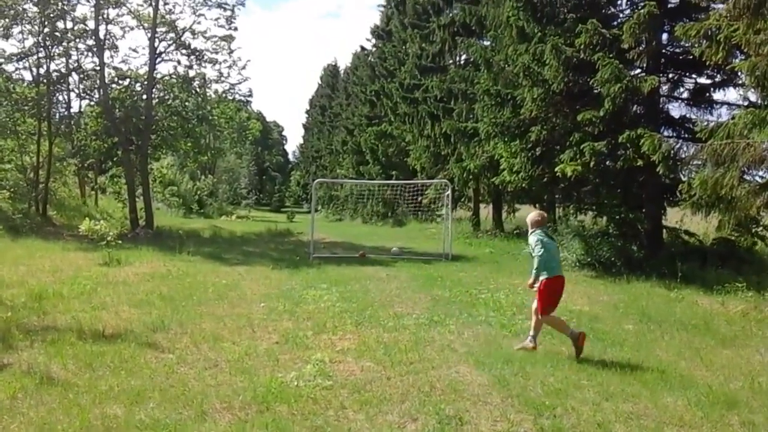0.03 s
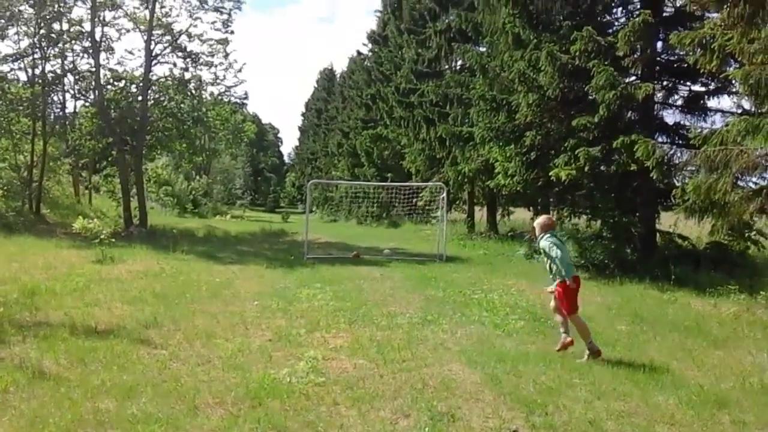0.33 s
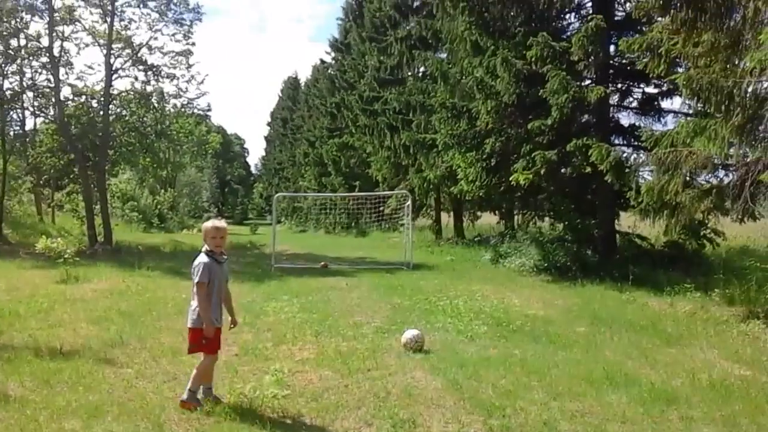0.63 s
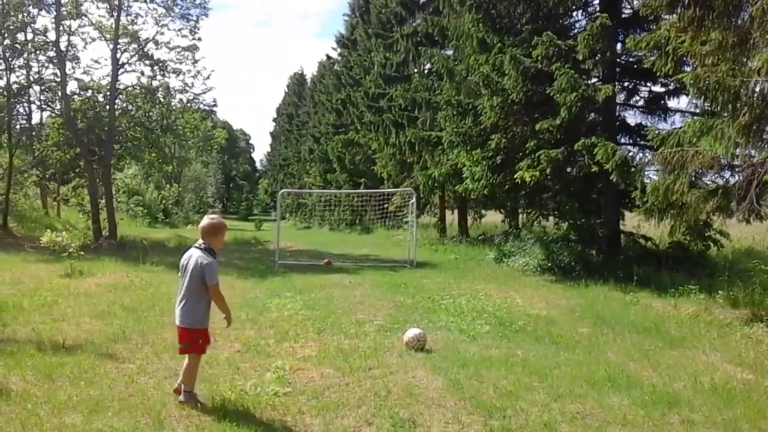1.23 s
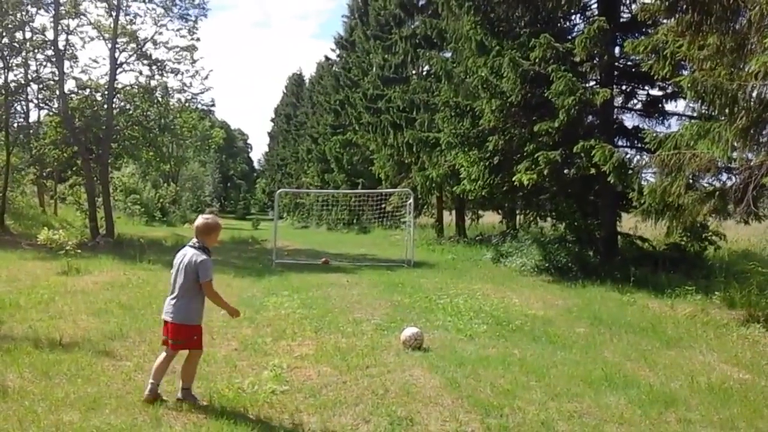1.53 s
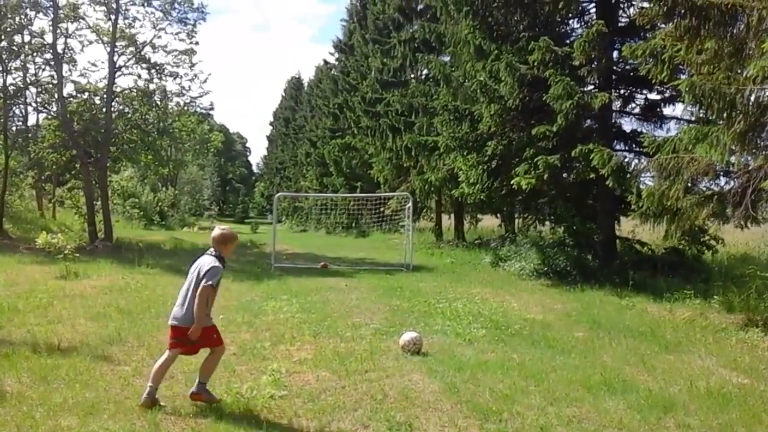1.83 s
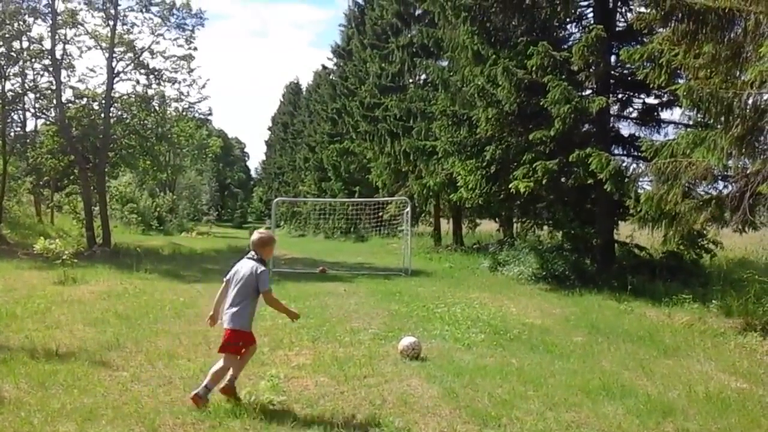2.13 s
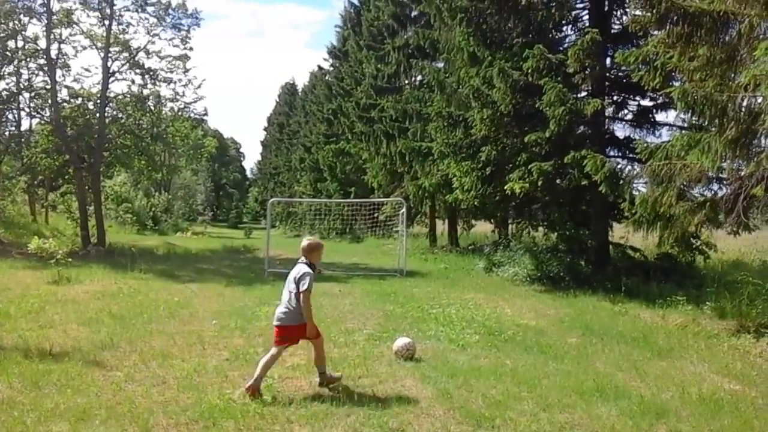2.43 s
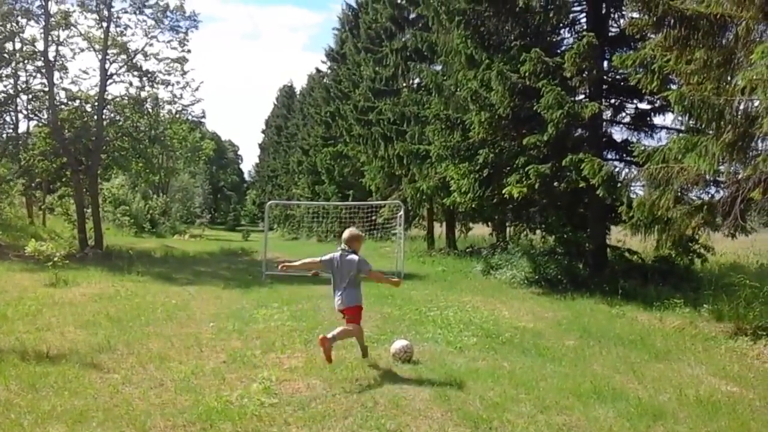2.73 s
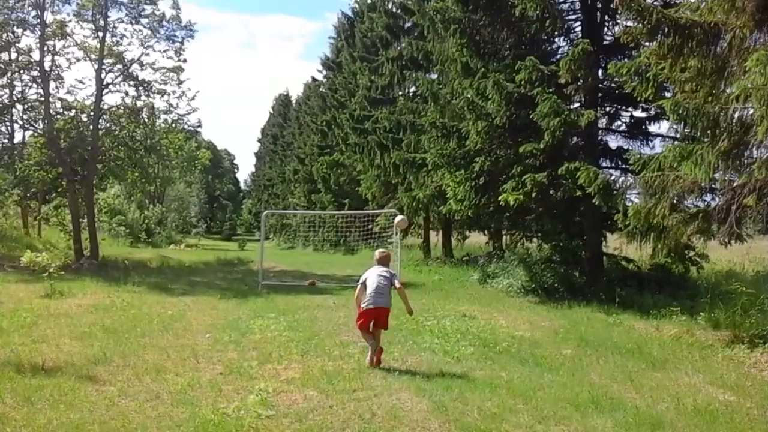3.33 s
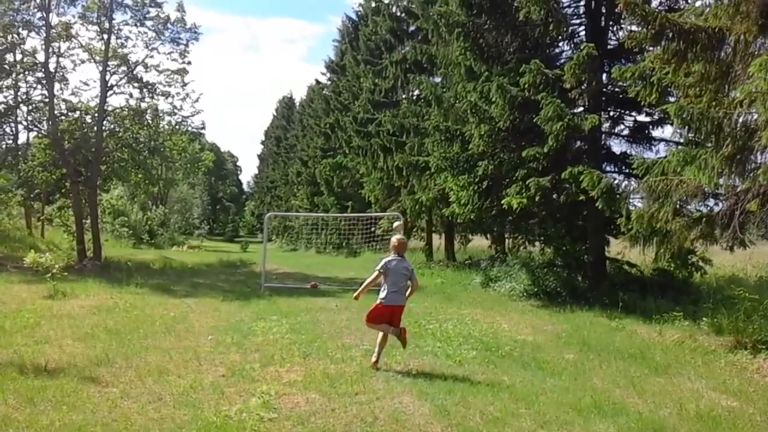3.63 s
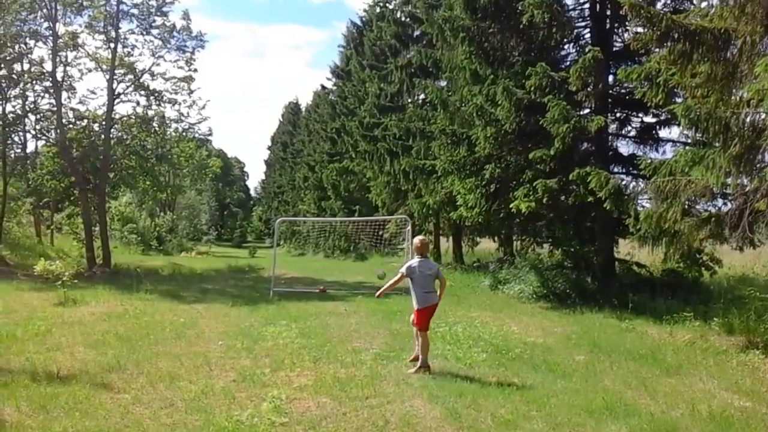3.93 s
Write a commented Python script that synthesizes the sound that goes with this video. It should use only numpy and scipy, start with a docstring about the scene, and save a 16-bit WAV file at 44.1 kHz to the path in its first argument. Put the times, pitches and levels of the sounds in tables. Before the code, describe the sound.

A football is kicked with a sharp thump after a soft run-up through grass, then clanks against a metal goal. An earlier goal rattle opens the scene. Light wind puffs at the microphone, with close ticks and a distant bird.

```python
"""A light metal football goal rattles under a shot, its tubes ringing and the trees round the meadow
echoing it, until the sound stops dead. A child runs up through the grass and kicks: the skin slaps,
the shell thumps, the air inside pings. This ball hits the goal frame too. Throughout, light wind puffs
at the microphone, something ticks close by and a small bird whistles far away."""
import sys
import numpy as np
from scipy import signal
from scipy.fft import rfft, irfft
from scipy.io import wavfile

SR = 44100
rng = np.random.default_rng(int(sys.argv[2]) if len(sys.argv) > 2 else 0)


def transcribe(signal):
    """Save signal, clipped to [-1, 1], as a 16-bit WAV file at the path in sys.argv[1]."""
    frames = np.atleast_2d(signal).T
    limited = np.clip(frames, -1, 1)
    pcm = np.round(limited * 32767).astype(np.int16)
    wavfile.write(sys.argv[1], SR, pcm)


N = 176400
TIME = np.arange(N) / SR


def amp(db):
    """Decibels to gain."""
    return 10 ** (np.asarray(db) / 20)


def unit_rms(x):
    """Scales to rms 1."""
    return x / np.sqrt(np.mean(x ** 2) + 1e-20)


def at_hz(points, hz):
    """Interpolates (Hz, value) rows along log frequency."""
    points_hz, values = np.transpose(points)
    return np.interp(np.log(hz + 1), np.log(points_hz + 1), values)


def gain_curve(points):
    """Interpolates (s, dB) rows to a gain per sample."""
    return amp(np.interp(TIME, *np.transpose(points)))


def colour(x, spectrum):
    """Minimum-phase filter from (Hz, dB) rows; attacks stay sharp."""
    hz = abs(np.fft.fftfreq(2 * N, 1 / SR))
    log_gain = np.log(amp(at_hz(spectrum, hz)))
    response = np.exp(np.conj(signal.hilbert(log_gain)))
    return np.fft.ifft(np.fft.fft(x, 2 * N) * response).real[:N]


def unit_colour(x, spectrum):
    """The same filter at unit power gain for white input."""
    return colour(x, spectrum) / np.linalg.norm(colour(signal.unit_impulse(N), spectrum))


def noise(spectrum, envelope):
    """White noise under an envelope, then coloured at unchanged power."""
    return unit_colour(rng.standard_normal(N) * envelope, spectrum)


def wander(rate_hz):
    """Smooth random drift of rms 1."""
    lowpass_divisor = 1 + (np.fft.rfftfreq(N, 1 / SR) / rate_hz) ** 4
    return unit_rms(irfft(rfft(rng.standard_normal(N)) / lowpass_divisor, N))


def burst(start_s, t60_s, rise_s=0.000093):
    """Linear rise, exponential decay."""
    age_s = np.maximum(TIME - start_s, 0)
    return np.minimum(age_s / rise_s, 1) * amp(-60 * np.maximum(age_s - rise_s, 0) / t60_s)


def ring(modes, blows):
    """Decaying (Hz, dB, t60 s) modes, struck at each (s, dB) blow."""
    t = TIME[:SR // 2]
    tone = sum(amp(db - 60 * t / t60_s) * np.sin(2 * np.pi * hz * t) for hz, db, t60_s in modes)
    return sum(amp(db) * np.interp(TIME - start_s, t, tone, left=0, right=0) for start_s, db in blows)


def reverb(x, decay):
    """Diffuse reflections, each band dying as the (Hz, t60 s) rows say."""
    hz, t, bands = signal.stft(rng.standard_normal(SR), SR, nperseg=256)
    fade = amp(-60 * t / at_hz(decay, hz)[:, None])
    tail = signal.istft(bands * fade, SR, nperseg=256)[1]
    return signal.fftconvolve(x, tail / np.linalg.norm(tail))[:N]


# Loose joints clashing. Each row: start in seconds, level in dB, rise in seconds, t60 in seconds.
JOINT_CLASHES = [(.008, -50.5, 0.0047, 0.31), (0.067, -45.5, 0.00078, 0.11), (.082, -31.5, 0.0088, .12),
                 (.104, -32, 0.0011, 0.024), (0.1092, -26.5, 0.00052, 0.043), (0.124, -44.5, 0.0016, 0.094),
                 (3.839, -29.5, 0.00045, 0.037), (3.851, -45, 0.0016, 0.52)]
# Metal snapping on metal; ball striking the frame. Each row: start in seconds, relative level in dB.
JOINT_SNAPS = [(.0695, -44), (0.0872, -41), (0.112, -36), (.126, -38), (.29, -50), (3.8353, -37.5),
               (3.8389, -32), (3.8408, -38), (3.871, -45), (3.9075, -49.5)]
BALL_KNOCKS = [(3.808, -41), (3.818, -50), (3.8275, -38)]
# Goal resonances. Each row: frequency in Hz, relative level in dB, t60 in seconds.
TUBE_MODES = [(1150, -22, .3), (2375, -3, .1), (3227, -13, .12), (4290, -7, .32), (4490, -14, .25),
              (4854, -7, .12), (5610, -7, .06), (6620, -10, .07)]
JOINT_MODES = [(3344, -5.5, 0.032), (3546, -6, 0.022), (4060, -4.5, 0.026), (4335, -5.5, 0.041),
               (4663, -6.5, .032), (5320, -9, .02)]
# Impact spectra. Each row: frequency in Hz, relative level in dB.
CLASH_SPECTRUM = [(100, -11), (500, -24), (900, -19.5), (2000, -10), (2800, -8), (3400, -4), (4400, 1),
                  (5300, -4), (6800, -11), (9000, -16), (15000, -31)]
KNOCK_SPECTRUM = [(50, -28), (150, -5), (450, -13), (800, -8.5), (1150, -1), (1500, -17), (2300, -15),
                  (3000, -24), (4500, -9), (7000, -30), (15000, -45)]


def goal_frame(grain_db=2, tubes_db=-9.5, full_drive_s=0.12):
    """The ball knocks the frame; joints clash and snap. Longer clashes drive the tubes harder."""
    clash_envelope = sum(amp(db) * burst(s, t60_s, rise_s) for s, db, rise_s, t60_s in JOINT_CLASHES)
    grain = unit_rms(amp(grain_db * wander(rate_hz=85)))
    clashes = noise(CLASH_SPECTRUM, clash_envelope * grain)
    tube_blows = [(s, db + 10 * np.log10(t60_s / full_drive_s)) for s, db, _, t60_s in JOINT_CLASHES]
    tubes = amp(tubes_db) * ring(TUBE_MODES, tube_blows)
    snaps = 2 * ring(JOINT_MODES, JOINT_SNAPS)
    knock_envelope = sum(amp(db) * burst(s, t60_s=0.018) for s, db in BALL_KNOCKS)
    return clashes + tubes + snaps + noise(KNOCK_SPECTRUM, knock_envelope)


# Echo off the trees. Each row: frequency in Hz, gain in dB.
ECHO_SPECTRUM = [(100, -16), (500, -12), (1100, -5.5), (1600, -7.5), (2500, -15), (3700, -10.5),
                 (4350, -10.5), (5000, -8), (6500, -8), (15000, -12.5)]
# Its decay. Each row: frequency in Hz, t60 in seconds.
ECHO_DECAY = [(100, 0.8), (1100, 1.9), (4000, 0.75), (8000, 0.36), (15000, 1.16)]


def tree_echo(x, near_db=-5.5, near_t60_s=0.13):
    """Short reflections from nearby, then the long answer of the trees."""
    near = amp(near_db) * reverb(x, [(1000, near_t60_s)])
    return near + colour(reverb(x, ECHO_DECAY), ECHO_SPECTRUM)


# Wash from the trees; leaves and distant air. Each row: frequency in Hz, relative level in dB.
BREEZE_SPECTRUM = [(100, -10), (500, -15.5), (800, -2.5), (1150, 1.5), (2200, -8.5), (4200, -7),
                   (7000, -20), (15000, -46)]
LEAF_SPECTRUM = [(120, -36.5), (200, -15), (268, 3), (399, -2), (957, -2.5), (1210, -5.5), (1810, -5.5),
                 (2060, -10), (4410, -9.5), (6130, -18.5), (15500, -20.5)]


def leaves(break_s, breeze_db=-54, leaf_db=-73.5, drift_db=1.64):
    """Air in the leaves: a faint wavering hiss, with a louder wash until the break."""
    breeze = noise(BREEZE_SPECTRUM, amp(breeze_db) * (TIME < break_s))
    return breeze + noise(LEAF_SPECTRUM, amp(leaf_db + drift_db * wander(rate_hz=6.1)))


# Wind rumble. Each row: time in seconds, level in dB.
RUMBLE_LEVELS = [(0, -61), (.2, -58.5), (.53, -54), (.67, -58.5), (.77, -74.5), (.9, -55.5), (1.12, -50),
                 (1.18, -79), (1.55, -70), (1.82, -64.5), (1.93, -81.5), (2.2, -67), (2.44, -50.5),
                 (2.65, -51), (2.76, -43.5), (2.86, -50), (3.05, -51.5), (3.14, -79), (3.32, -54),
                 (3.42, -81), (3.78, -68.5), (3.93, -60.5), (4, -69.5)]
# Its spectrum. Each row: frequency in Hz, relative level in dB.
RUMBLE_SPECTRUM = [(20, -33.5), (45, -3), (70, -3), (115, 1), (200, -9.5), (300, -17.5), (500, -31),
                   (1200, -44.5), (5000, -95)]
# Single eddies. Each row: centre in seconds, level in dB, pitch in Hz.
EDDIES = [(0.091, -40, 177), (.131, -42, 130), (0.427, -39.5, 110), (0.461, -31, 278), (.468, -32, 113),
          (0.936, -42, 138), (0.966, -40, 193), (1.009, -40.5, 142), (1.039, -35.5, 195),
          (1.07, -39.5, 195), (1.1084, -31.5, 224), (1.848, -53, 108.6), (2.321, -40, 104),
          (2.389, -38.5, 102), (2.447, -37.5, 156), (2.467, -38.5, 193), (2.56, -39.5, 109),
          (2.58, -36, 134), (2.73, -32, 125), (2.784, -30.5, 127), (2.814, -29.5, 121), (2.966, -40.5, 91),
          (3.019, -37.5, 140), (3.053, -38.5, 124), (3.29, -47.5, 154), (3.341, -40, 116),
          (3.676, -49, 127), (3.833, -41.5, 114)]


def wind(lump_db=3, width_cycles=0.44, edge_db=-15):
    """Wind on the microphone: lumpy rumble, and eddies of about one pressure swing each."""
    lumps = unit_rms(amp(lump_db * wander(rate_hz=40)))
    out = noise(RUMBLE_SPECTRUM, gain_curve(RUMBLE_LEVELS) * lumps)
    for centre_s, db, hz in EDDIES:
        cycles = (TIME - centre_s) * hz
        phase = 2 * np.pi * cycles
        swing = np.sin(phase) + amp(edge_db) * np.sin(2 * phase)  # the octave steepens the front
        out -= amp(db) * np.exp(-0.5 * (cycles / width_cycles) ** 2) * swing
    return out


# Rustle of grass and clothes. Each row: time in seconds, level in dB.
RUSTLE_LEVELS = [(0, -61.5), (.45, -61), (.8, -69.5), (1.1, -64.5), (1.5, -74.5), (2.05, -79.5), (2.3, -65),
                 (2.5, -62), (2.8, -63), (2.9, -60), (3.05, -60.5), (3.2, -71.5), (3.37, -67), (3.6, -74),
                 (4, -59)]
# Shoes brushing the grass. Each row: centre in seconds, level in dB, width in seconds.
SHOE_SCUFFS = [(2.415, -65.5, 0.014), (2.901, -58.5, 0.009), (2.978, -51.5, .005)]
# Their spectra. Each row: frequency in Hz, relative level in dB.
RUSTLE_SPECTRUM = [(100, -0.5), (400, 1), (1000, 5.5), (2500, -6.5), (4500, -3), (6500, -14), (15000, -16)]
SCUFF_SPECTRUM = [(300, -11), (2800, -6), (4500, 4.5), (15000, -27)]


def grass():
    """Grass and clothes give a fine grainy rustle that swells with the run-up; shoes scuff the blades."""
    grain = unit_rms(amp(wander(rate_hz=20) + 1.2 * wander(rate_hz=700)))
    rustle = noise(RUSTLE_SPECTRUM, gain_curve(RUSTLE_LEVELS) * grain)
    strokes = sum(amp(db) * np.exp(-0.5 * ((TIME - s) / width_s) ** 2) for s, db, width_s in SHOE_SCUFFS)
    return rustle + noise(SCUFF_SPECTRUM, strokes * grain)


# Close ticks. Each row: start in seconds, base level in dB, rustle level in dB, rustle length in seconds.
CLOSE_TICKS = [(0.245, -48, -75, .003), (0.4808, -43, -54, 0.023), (.539, -47, -69, 0.0036),
               (0.565, -43, -78, 0.0055), (0.655, -35.5, -57, 0.047), (0.883, -44, -63.5, 0.053),
               (0.9552, -49.5, -61, 0.0039), (1.0603, -45, -54.5, 0.059), (1.203, -46.5, -62, 0.11),
               (1.381, -56, -76, 0.018), (1.4235, -61, -74, 0.014), (1.504, -61, -78, 0.011),
               (2.134, -56, -61.5, 0.11), (3.304, -58, -73.5, 0.056)]
# Their spectrum. Each row: frequency in Hz, relative level in dB.
TICK_SPECTRUM = [(300, -9.5), (2800, -11.5), (3800, -1.5), (5000, 1.5), (6200, 2.5), (7200, -11.5),
                 (8200, -8.5), (10000, -5.5), (11500, -20.5), (12400, -8), (13800, -8.5), (16000, -41)]


def ticks(click_db=14, fizz_db=-5.5, release_s=0.0067):
    """Dry clicks near the microphone, each with a short fizz and a brief rustle."""
    envelope, clicks = np.zeros(N), np.zeros(N)
    for start_s, db, rustle_db, length_s in CLOSE_TICKS:
        clicks[round(start_s * SR)] = amp(db + click_db)
        envelope += amp(db + fizz_db) * burst(start_s, t60_s=0.015)
        rustle_gate = np.clip((start_s + length_s - TIME) / release_s + 1, 0, 1)
        envelope += amp(rustle_db) * burst(start_s, t60_s=1.0) * rustle_gate
    return unit_colour(clicks, TICK_SPECTRUM) + noise(TICK_SPECTRUM, envelope)


# Song. Each row: start and length in seconds, first, middle and last pitch in Hz, level in dB.
BIRD_NOTES = [(0.58, 0.022, 4700, 3700, 3350, -62), (0.877, 0.1, 3580, 3210, 3370, -69),
              (1.005, 0.078, 4100, 3640, 3550, -63), (1.184, 0.049, 4300, 3920, 3980, -60),
              (1.36, 0.051, 4000, 3690, 3570, -72), (1.504, 0.072, 3500, 3190, 3260, -78),
              (1.875, 0.058, 4760, 4600, 4420, -80.5), (2.09, .05, 3700, 3450, 3330, -78),
              (2.264, 0.037, 3530, 3520, 3500, -65.5), (2.515, 0.04, 3600, 3550, 3320, -61.5),
              (2.585, 0.023, 5070, 5000, 5000, -65), (2.748, 0.033, 3040, 3164, 3080, -62),
              (3.368, 0.083, 4760, 4660, 4550, -71), (3.542, 0.081, 4880, 4400, 4300, -72),
              (3.62, 0.048, 3400, 3210, 3190, -75), (3.718, 0.085, 3610, 3670, 3850, -74)]


def bird(flutter_db=2.5, echo_db=-7, echo_t60_s=0.23):
    """A far bird's thin slurred whistles, blurred by the trees."""
    song = np.zeros(N)
    waver = 1 + 0.00775 * wander(rate_hz=115)
    for start_s, length_s, first_hz, middle_hz, last_hz, db in BIRD_NOTES:
        progress = np.clip((TIME - start_s) / length_s, 0, 1)
        slur = np.polyfit([0, 0.5, 1], [first_hz, middle_hz, last_hz], 2)
        hz = np.polyval(slur, progress) * waver
        arch = np.sqrt(4 * progress * (1 - progress))
        song += amp(db) * arch * np.sin(2 * np.pi * np.cumsum(hz) / SR)
    song *= unit_rms(amp(flutter_db * wander(rate_hz=59)))
    return song + amp(echo_db) * reverb(song, [(4000, echo_t60_s)])


# The foot meets the ball, sinks in, and the ball springs free.
# Each row: start in seconds, then slap, ping and thump levels in dB.
KICK_PUSHES = [(2.9846, -22, -22, -30), (2.9866, -26, -25.5, -26), (2.9966, -42, -50, -24.5)]
# Flexing shell; air inside the ball. Each row: frequency in Hz, relative level in dB, t60 in seconds.
SHELL_MODES = [(123, 1, 0.039), (170, -0.5, 0.033), (384, -9, 0.02), (560, -4.5, 0.018), (633, -4, 0.041)]
CAVITY_MODES = [(1098, -16, .08), (1416, -19, .06), (2010, -20, .03), (2470, -23, .03), (3190, -11, .022),
                (4400, -4.5, .014), (5250, -1, .012), (7380, -18, .012)]
# Shoe on skin. Each row: frequency in Hz, relative level in dB.
SLAP_SPECTRUM = [(40, -24), (250, -3.5), (500, 1.5), (700, 4.5), (900, -14), (1500, -13.5), (2000, -6),
                 (2600, -16.5), (5000, -6.5), (7000, -35), (16000, -49)]


def kick(pulse_db=6.5, pulse_tau_s=0.00069):
    """Each push slaps the skin, pings the air inside and thumps the shell with a pressure pulse."""
    slap = noise(SLAP_SPECTRUM, sum(amp(db) * burst(s, t60_s=0.0091) for s, db, _, _ in KICK_PUSHES))
    ping = ring(CAVITY_MODES, [(s, db) for s, _, db, _ in KICK_PUSHES])
    shell_blows = [(s, db) for s, _, _, db in KICK_PUSHES]
    thump = ring(SHELL_MODES, shell_blows)
    for start_s, db in shell_blows:
        age = np.maximum(TIME - start_s, 0) / pulse_tau_s
        thump += amp(db + pulse_db) * age * (2 - age) * np.exp(-age)
    return slap + ping + thump


# Reflections of the kick. Each row: frequency in Hz, relative level in dB.
SCATTER_SPECTRUM = [(59, -17), (100, 0.5), (268, -4), (317, -14), (546, -7.5), (1630, -21.5), (1880, -14),
                    (2690, -22.5), (5150, -16), (15000, -63)]


def kick_scatter(kick_s, early_db=-44, tail_db=-68, peak_s=0.031, width_s=0.025):
    """Ground and nearby trees scatter the kick: a quick swell of noise and a faint tail."""
    early = np.exp(-0.5 * ((TIME - kick_s - peak_s) / width_s) ** 2) * (TIME > kick_s)
    tail = burst(kick_s, t60_s=0.42, rise_s=peak_s)
    return noise(SCATTER_SPECTRUM, amp(early_db) * early + amp(tail_db) * tail)


def scene():
    """Same mix in both channels; the goal and its echo are muted from the break to the kick."""
    break_s, kick_s = 0.42, KICK_PUSHES[0][0]
    rattle = goal_frame()
    goal = (rattle + tree_echo(rattle)) * ((TIME < break_s) | (TIME > kick_s))
    mono = goal + leaves(break_s) + wind() + grass() + ticks() + bird() + kick() + kick_scatter(kick_s)
    return np.array([mono, mono])


def record(dry):
    """Faint hiss in opposite polarity on the two channels, a bass cut and a band limit."""
    hiss_db, bass_cut_hz, band_limit_hz = -82, 48, 16100
    hiss = noise([(100, 0), (4000, -19), (8000, -5), (14000, -5.5)], amp(hiss_db))
    highpass = signal.butter(4, bass_cut_hz, "high", fs=SR, output="sos")
    lowpass = signal.firwin(511, band_limit_hz, window=("kaiser", 9), fs=SR)
    out = signal.sosfilt(highpass, dry + np.array([hiss, -hiss]))
    return signal.oaconvolve(out, lowpass[None], "same")


dry = scene()
out = record(dry)
transcribe(out)
```